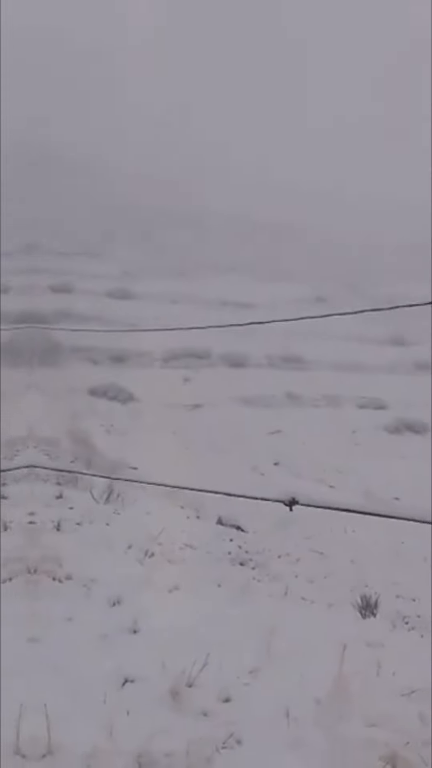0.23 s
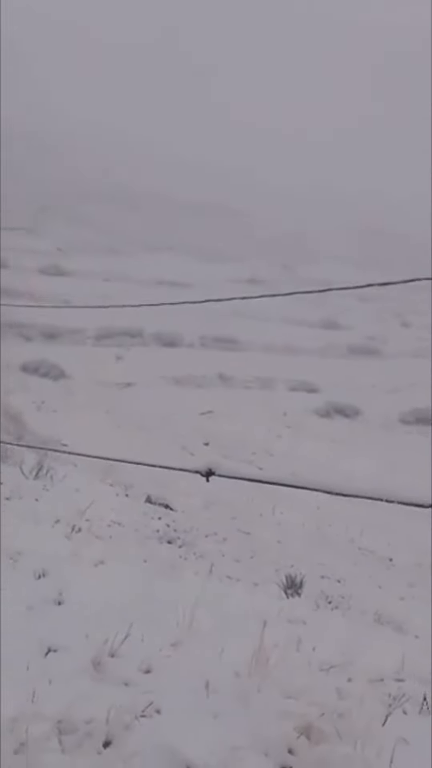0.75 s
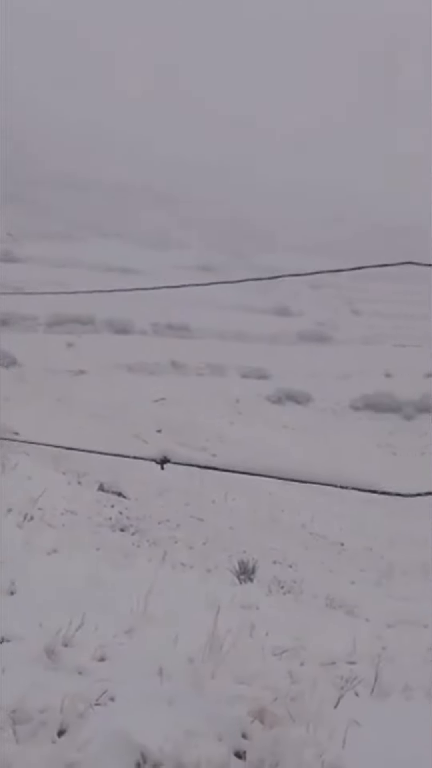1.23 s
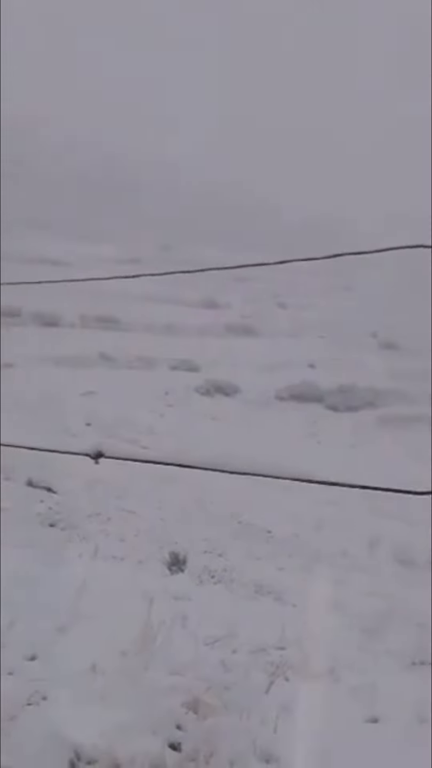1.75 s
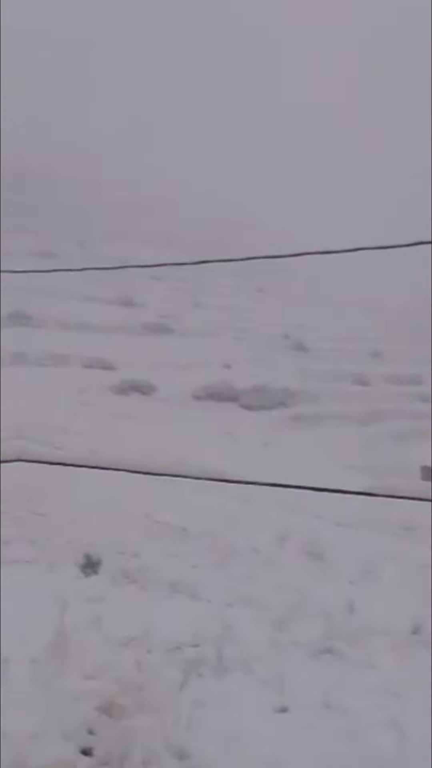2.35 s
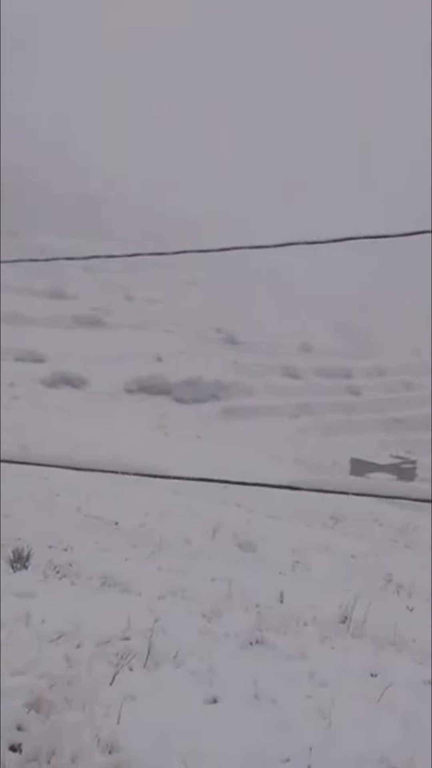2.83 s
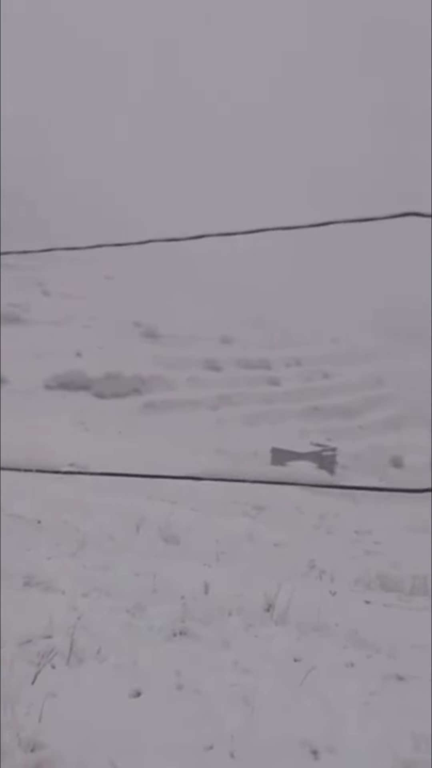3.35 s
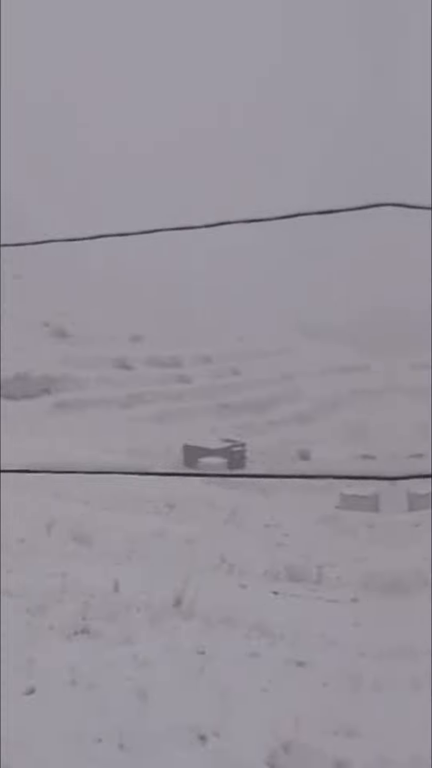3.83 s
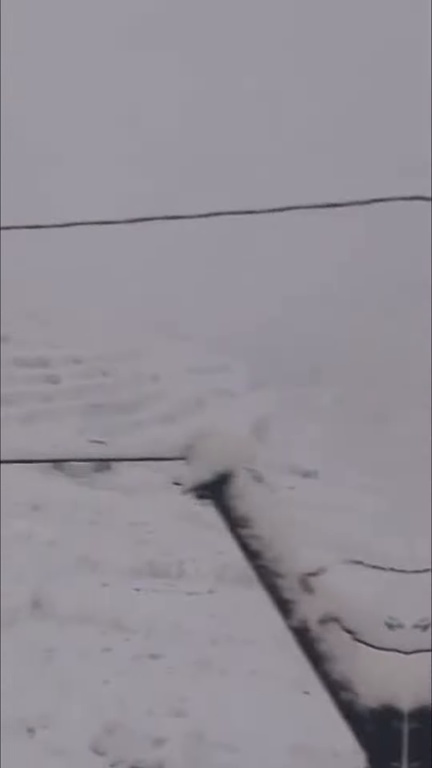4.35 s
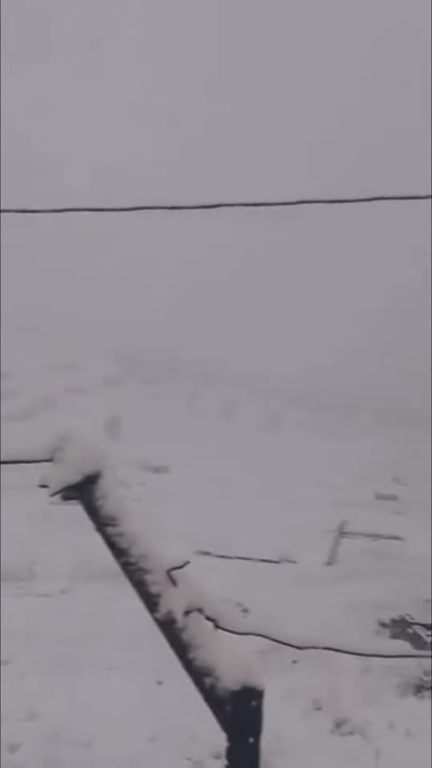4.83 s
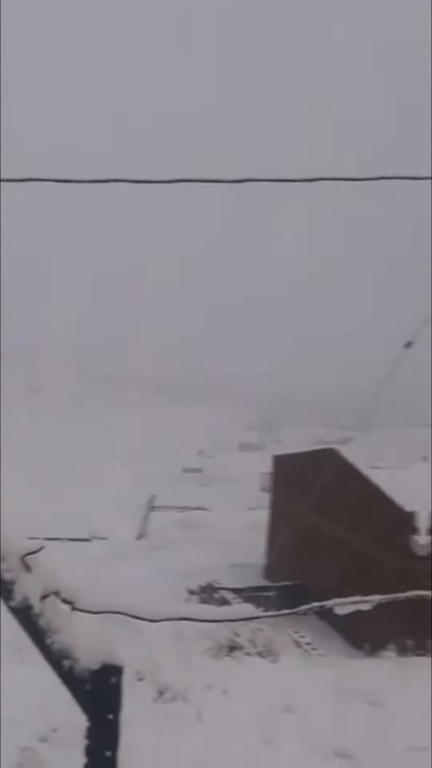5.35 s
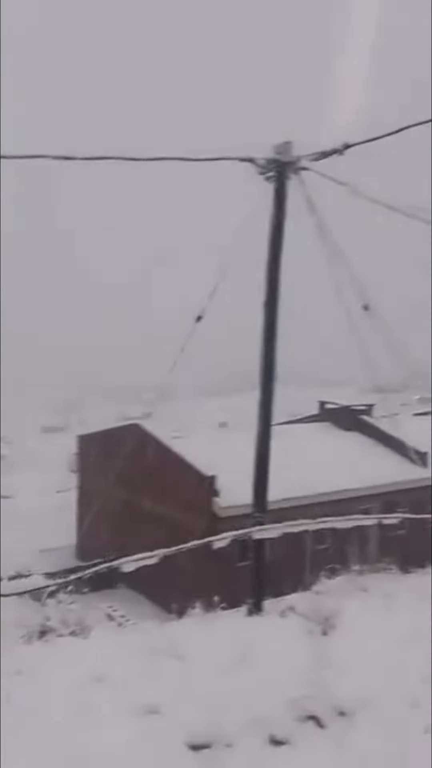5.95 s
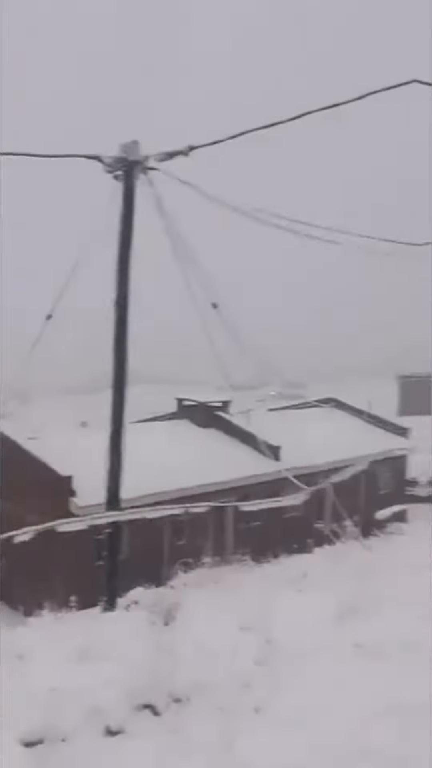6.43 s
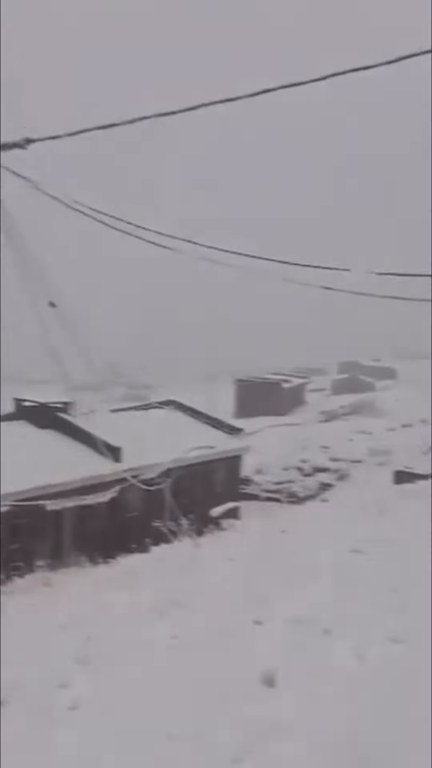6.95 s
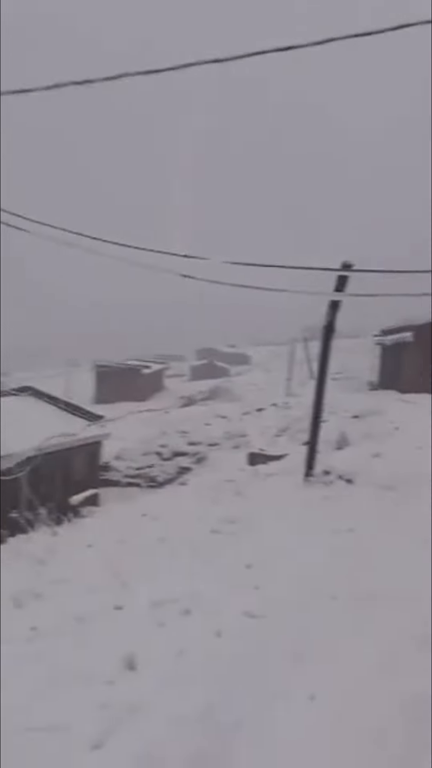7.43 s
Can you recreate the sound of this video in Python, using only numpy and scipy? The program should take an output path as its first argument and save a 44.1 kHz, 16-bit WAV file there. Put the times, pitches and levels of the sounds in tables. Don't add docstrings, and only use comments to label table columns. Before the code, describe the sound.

Gusty wind buffets a handheld phone microphone with deep low thumps over a steady open roar, with brief loose plastic rattles and tiny icy ticks.

```python
import sys
import numpy as np
from scipy import signal
from scipy.fft import rfft, irfft, next_fast_len
from scipy.io import wavfile
from scipy.ndimage import uniform_filter1d

SR = 44100
rng = np.random.default_rng(int(sys.argv[2]) if len(sys.argv) > 2 else 0)


def how_loud(loudness_db):
    steps = np.asarray(loudness_db, float) / 20
    return 10 ** steps


def wav_out(sig):
    wavfile.write(sys.argv[1], SR, np.round(np.clip(np.atleast_2d(sig).T, -1, 1) * 32767).astype(np.int16))


N = 339433
T = np.arange(N) / SR
SIZE = next_fast_len(N)
HZ = np.maximum(np.arange(SIZE // 2 + 1) * SR / SIZE, 1e-3)
SIDES = np.array([[.5], [-.5]])
TOP_HZ = 10000

# t/s, peak level/dB, low modes/dB, high modes/dB (both against the crack)
STRIKES = [(.6935, -44, 7, -4), (1.1172, -26, 0, 0), (1.243, -30.5, -3, 0), (1.2974, -33, 0, 0),
           (1.3524, -32, 1, 0), (1.4272, -27, 0, 0), (2.4009, -27, 0, 1), (2.454, -41, -4, -5),
           (2.4783, -35, -2, 1), (3.2802, -45, 0, 0), (3.6857, -34.5, 0, 0), (4.6216, -48, 0, 0),
           (4.9364, -28, 0, 0), (4.992, -30.5, 0, 0), (7.0275, -35, 4, -4), (7.1452, -39, 6, -4),
           (7.199, -46, 8, -4), (7.294, -48, 6, -4)]
# t/s, peak level/dB, f/Hz, t60/s, snap against the ring/dB
ICE_GRAINS = [(2.6712, -47, 9530, 0.007, -6), (3.013, -44, 9700, 0.0085, -15),
              (3.3624, -60, 6010, 0.007, 2), (3.3736, -52, 6010, 0.007, 0), (5.5543, -37, 9680, 0.0065, -8),
              (5.5742, -42.5, 7830, 0.0063, 5), (5.752, -50, 6570, 0.007, -4),
              (5.771, -47, 9140, 0.0058, -6), (5.7774, -38.5, 8860, 0.0065, -2),
              (5.9838, -61, 6480, 0.007, -3), (6.1818, -48, 9570, 0.007, -6),
              (6.2996, -45, 9740, 0.007, -6), (6.834, -52, 9700, 0.007, -8)]


def over_hz(table):
    hz, *columns = np.transpose(table)
    return [np.interp(np.log(HZ), np.log(hz), column) for column in columns]


def over_time(table):
    s, *columns = np.transpose(table)
    return [np.interp(T, s, column) for column in columns]


def bump(s, length):
    return np.exp(-((T - s) / length) ** 2)


def walk(rate):
    hold = int(SR / rate)
    held = np.repeat(rng.standard_normal(N // hold + 1), hold)
    slewed = uniform_filter1d(uniform_filter1d(held, hold), hold)
    return 1.3 * slewed[:N]


def band(lo_hz, hi_hz, order=12):
    below_top = 1 / (1 + (HZ / hi_hz) ** order)
    below_bottom = 1 / (1 + (HZ / lo_hz) ** order)
    return np.sqrt(below_top - below_bottom)


def air(gain, likeness, lead=0, pan_db=0):
    shared, own = rfft(rng.standard_normal((2, SIZE)))
    c = np.clip(likeness, 0, 1)
    apart = np.sqrt(1 - c ** 2)
    left = how_loud(pan_db / 2) * np.exp(1j * lead)
    right = how_loud(-pan_db / 2)
    sum_gain = np.sqrt(np.abs(left + c * right) ** 2 + (1 - c ** 2) * right ** 2)
    spectra = np.array([left * shared, right * (c * shared + apart * own)])
    pair = irfft(gain / sum_gain * spectra, SIZE)[:, :N]
    return pair / pair.mean(axis=0).std()


def layers(levels_db, edges_hz, colour, flicker_db, *ports):
    gain = how_loud(over_hz(colour)[0])
    total = 0
    for db, flicker, lo, hi in zip(levels_db, flicker_db, edges_hz, edges_hz[1:]):
        level = how_loud(db + flicker * walk(12))
        total = total + level * air(gain * band(lo, hi), *ports)
    return total


def add(out, s, sound):
    i = int(s * SR)
    out[:, i:i + sound.shape[1]] += sound[:, :N - i]


def wind():
    # t/s, gust on the ports/dB, far roar as the phone turns away/dB
    wind_course = [(0, -41, -43.5), (.35, -45, -46), (.9, -38.5, -45), (1.35, -30, -46),
                   (1.7, -33.5, -44.5), (2.1, -29.5, -46), (2.5, -31.5, -47.5), (2.9, -34.5, -48),
                   (3.4, -33.5, -48), (3.85, -32.5, -50), (4.2, -43, -49.5), (4.7, -39.5, -50.5),
                   (5.1, -39, -50), (5.48, -33, -49), (5.75, -40, -49), (6.05, -31, -50.5),
                   (6.8, -45, -49.5), (7.7, -46.5, -50.5)]
    gust_db, far_db = over_time(wind_course)
    return gust_db + 35, far_db + 48


def surges():
    surge_crests = [(2.457, 0.31, 3.26, 0.31), (3.166, -0.58, 3.4, 0.13), (3.472, -0.77, 3.68, 0.21),
                    (3.44, -0.35, 9.6, 0.1), (4.822, 0.051, 3.57, 0.66), (6, 0.062, 4.1, 0.26),
                    (7.137, 0.061, 2.5, .35)]
    swing = 0
    for s, crest, hz, length in surge_crests:
        swing = swing + crest * bump(s, length) * np.cos(2 * np.pi * hz * (T - s))
    heave = how_loud(-27) * air(band(2.2, 6.55, order=4), 1.0)
    return swing + heave


def eddies():
    eddy_edges = [7, 35, 110, 210]
    # f/Hz, level per Hz/dB
    eddy_colour = [(3.5, -24), (6.0, 5.5), (16, -1.5), (24, -12), (32, -17), (54, -19), (109, -26.5),
                   (260, -28.5), (340, -55.5), (570, -120)]
    # f/Hz, likeness of the ports/0-1
    eddy_likeness = [(10, 0), (25, 0.4), (90, 0.41), (170, 0.77)]
    # level/dB, rise per dB of gust/dB, flicker/dB
    eddy_bands = [(-32, 0.24, 1), (-38.5, 0.47, 1.5), (-40, 0.71, 1)]
    # t/s, thump level/dB, length/s, left minus right/dB
    puffs = [(0.69, -29.5, .06, 14), (0.904, -27.5, 0.073, 7), (1.115, -28.5, 0.055, -2),
             (1.413, -25.5, 0.064, 4.5), (1.709, -24, 0.084, -6), (1.881, -25, 0.042, 10),
             (2.08, -20.5, 0.16, 6), (2.297, -29.5, 0.073, 0), (2.5, -29, 0.061, 1),
             (2.753, -28, 0.044, 13), (2.95, -30, .08, -1), (3.25, -28.5, .06, 6),
             (3.776, -23.5, 0.047, -1.5), (3.908, -29, .07, -11), (4.09, -36, 0.042, 0),
             (4.716, -27.5, 0.077, -4), (5.0, -30.5, .08, 1), (5.57, -27.5, 0.11, 6), (6.0, -36.5, 0.16, 2),
             (6.248, -41, 0.073, 2)]
    gust_db = wind()[0]
    likeness = over_hz(eddy_likeness)
    levels_db = [db + per_gust * gust_db for db, per_gust, _ in eddy_bands]
    flicker_db = [flicker for *_, flicker in eddy_bands]
    whirl = layers(levels_db, eddy_edges, eddy_colour, flicker_db, *likeness)
    wander = how_loud(3.5 * walk(10) * SIDES)
    thumps = sum(how_loud(db + pan_db * SIDES) * bump(s, length) for s, db, length, pan_db in puffs)
    big = air(band(9, 30, order=8), *likeness)
    return whirl * wander + thumps * big


def rattle():
    # f/Hz, level/dB, t60/s, swell/s, left minus right/dB
    rattle_modes = [(469.3, -10.5, 0.087, 0.005, -2), (1460, -9, 0.033, 0.0025, 9.5),
                    (1767, -11, 0.022, 0.008, -8.5), (2070, -7, .03, 0.0012, 10),
                    (2310, -13, 0.05, 0.0025, 4), (2650, -10, 0.03, 0.0012, 8),
                    (3276, 5, 0.004, 0.0004, 4.5), (4130, -9.5, 0.017, 0.00054, -3.5),
                    (4400, -9, 0.03, 0.0012, -5.5), (4656, -6.5, 0.028, 0.0022, 1),
                    (5040, -15, 0.018, .001, 1.5), (6420, -24, 0.008, 0.0004, -4.5),
                    (8100, -28, .02, .001, 14.5), (4750, 2, .010, .0004, 0)]
    mode_leads = np.array([0, 0, -.4, 3.1, -2.6, -2.6, 1.5, 2.3, 2.3, -2.1, 1.5, 0, 0, 3.1])
    tail_bands = [(1510, 2700, -7), (2650, 4300, -12), (4200, 5050, -10.5)]
    tail_t60_s, tail_late_s, crack_t60_s = .115, .007, .007
    rebound_lag = int(.0017 * SR)
    out = np.zeros((2, N))
    t = T[:int(.15 * SR)]
    scatter = np.array([how_loud(db) * air(band(lo, hi, order=24), 0.11) for lo, hi, db in tail_bands])
    crack = how_loud(-8) * air(band(1500, 5500), 0.16)
    tail_shape = (1 - np.exp(-(t / tail_late_s) ** 2)) * 1000. ** (-t / tail_t60_s)
    chances = rng.standard_normal((len(STRIKES), len(rattle_modes)))
    for (s, db, low_db, high_db), chance in zip(STRIKES, chances):
        hit = 0
        for (hz, mode_db, t60, swell, pan_db), lead, c in zip(rattle_modes, mode_leads, chance):
            shape = (1 - np.exp(-t / swell)) * 1000. ** (-t / t60)
            tilt_db = low_db * (hz < 1900) + high_db * (hz > 3800)
            gain = how_loud(mode_db + 1.2 * c + tilt_db + pan_db * SIDES)
            ring = np.sin(2 * np.pi * hz * t + lead * SIDES)
            hit = hit + gain * shape / shape.max() * ring
        hit[:, rebound_lag:] += how_loud(-4) * hit[:, :-rebound_lag].copy()
        i = int(s * SR)
        tail_gain = how_loud(np.array([low_db / 2, 0, high_db]))
        tail = np.tensordot(tail_gain, scatter[:, :, i:i + len(t)], axes=1) * tail_shape
        snap = crack[:, i:i + len(t)] * 1000. ** (-t / crack_t60_s)
        add(out, s, how_loud(db - 3.5) * (hit + tail + snap))
    return out


def ice():
    out = np.zeros((2, N))
    t = T[:int(.03 * SR)]
    snaps = rng.standard_normal((len(ICE_GRAINS), 2, len(t)))
    for (s, db, hz, t60, snap_db), snap in zip(ICE_GRAINS, snaps):
        tick = np.sin(2 * np.pi * hz * t) + how_loud(snap_db) * snap
        add(out, s, how_loud(db + 7.5) * tick * 1000. ** (-t / t60))
    return out


def roar():
    roar_edges = [210, 750, 1600, 5800, 10000]
    # f/Hz, level per Hz/dB
    roar_colour = [(59, -19.5), (100, 1.5), (150, -9.5), (256, -4), (348, -8), (406, -8.5), (737, -22.5),
                   (859, -23.5), (1000, -16.5), (1080, -21), (1440, -21), (1920, -31), (2330, -31.5),
                   (4310, -39.5), (9840, -38.5), (12800, -81.5), (21600, -120)]
    # f/Hz, likeness/0-1, left leads by/rad, left minus right/dB
    port_pair = [(200, .75, 0, -1), (430, .9, 0, -1), (600, .83, -.1, -2), (700, .55, 0, -3),
                 (780, .05, -.3, -1), (840, .45, -2.9, 1), (950, .55, -1.7, 6), (1050, .69, -.75, 3),
                 (1250, .75, -.25, -2), (1460, .32, -.2, -7), (1650, .05, -.5, -3), (2000, .14, -.5, 1),
                 (2250, .5, 0, 0), (2750, .05, 0, 3), (2900, .2, 3.6, 2), (3300, .36, 3.1, -1),
                 (4100, .2, 3, -2), (4900, .1, 1, 1), (5600, .2, 0, 0), (6500, .45, 0, 0),
                 (8500, .3, 2.5, 0), (9200, .3, 3, 0)]
    # level/dB, rise per dB of gust/dB, rise per dB of far roar/dB
    roar_bands = [(-39, 0.23, 0.28), (-48, 0.05, 0.81), (-55, 0.0654, 0.76), (-64, 0.06, -0.22)]
    # t/s, length/s, lift/dB
    spray = [(2.73, 0.099, 5.5), (3.3, 0.36, 3), (5.2, .1, 3), (5.6, .3, 0.5), (6.55, 0.14, 3.5)]
    gust_db, far_db = wind()
    levels_db = [db + per_gust * gust_db + per_far * far_db for db, per_gust, per_far in roar_bands]
    levels_db[-1] = levels_db[-1] + sum(db * bump(s, length) for s, length, db in spray)
    return layers(levels_db, roar_edges, roar_colour, [0.5, 0.51, 0.79, 1.5], *over_hz(port_pair))


def thin_treble(x):
    # f/Hz, weight
    first_lost = [(3500, 0), (4700, .3), (5700, 1.1), (6500, 2), (8600, 2.1), (9100, .7), (10000, 1.3)]
    # from t/s, to t/s, from f/Hz, to f/Hz, share lost/0-1
    holes = [(1.25, 1.295, 5500, 10000, .95), (1.295, 1.44, 6300, 10000, .7), (1.45, 1.57, 7800, 8800, 1),
             (1.64, 1.68, 7600, 8800, .8), (4.98, 5.0, 6200, 10000, .65)]
    # f/Hz, threshold against the lines nearby
    line_floor = [(1500, 0), (2500, .6), (5000, .9), (8000, 1.1)]
    hz, s, z = signal.stft(np.array([x[0] + x[1], x[0] - x[1]]) / 2, SR, nperseg=1024)
    dice = rng.random((2, len(hz) // 8 + 1, len(s) // 2 + 1))
    dice = dice.repeat(8, axis=1).repeat(2, axis=2)[:, :len(hz), :len(s)]
    thinning = np.clip(.43 + .13 * walk(25), 0, 1)
    thinning = thinning * np.prod([1 - bump(row[0], .016) for row in STRIKES + ICE_GRAINS], axis=0)
    lost = np.zeros(z.shape)
    lost[1] = np.outer(np.interp(hz, *np.transpose(first_lost)), np.interp(s, T, thinning))
    lost[:, (hz >= 6800) & (hz < 9200)] += .08
    for start, end, lo, hi, share in holes:
        lost[:, (hz >= lo) & (hz < hi)] += share * ((s >= start) & (s <= end))
    near = uniform_filter1d(np.abs(z), 8, axis=1)
    z = z * (np.abs(z) >= near * np.interp(hz, *np.transpose(line_floor))[:, None])
    above = hz > TOP_HZ + 150
    loud_db = 10 * np.log10(uniform_filter1d(np.abs(z[:, above]) ** 2, 8, axis=1) + 1e-18)
    lost[:, above] = 1 / (1 + how_loud(2 * (loud_db + 104.5)))
    mid, side = signal.istft(z * (dice >= lost), SR, nperseg=1024)[1][:, :N]
    return np.array([mid + side, mid - side])


def scene():
    return surges() + eddies() + rattle() + ice() + roar()


def top_cut(x):
    return signal.sosfilt(signal.butter(12, 15030, fs=SR, output="sos"), x)


def record(dry):
    low_pass = signal.ellip(12, .2, 80, TOP_HZ, fs=SR, output="sos")
    x = signal.sosfilt(low_pass, dry)
    block_starts = np.arange(N) % 128 == 0
    jumps = .3 + rng.standard_normal((2, N))
    steps = block_starts * (np.abs(x) + .03) * jumps * how_loud(-42 + 3 * walk(30))
    grit = irfft(rfft(steps, SIZE) * band(10100, 15000, order=60), SIZE)[:, :N]
    mix = thin_treble(np.clip(x + grit, -1, 1))
    return top_cut(mix)


dry = scene()
out = record(dry)
wav_out(out)
```